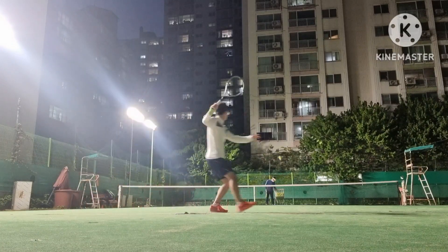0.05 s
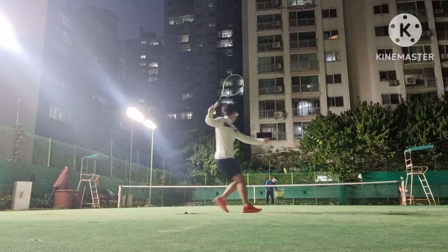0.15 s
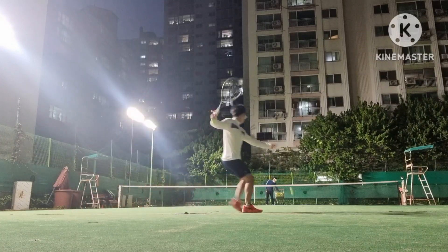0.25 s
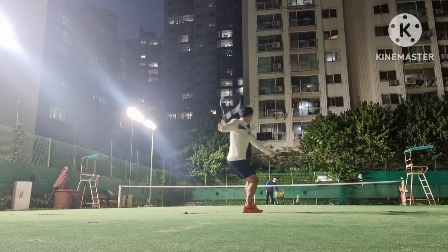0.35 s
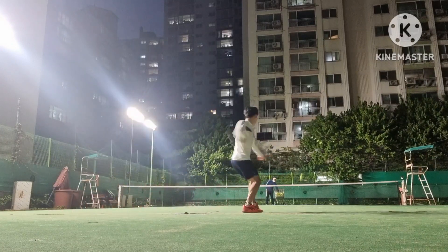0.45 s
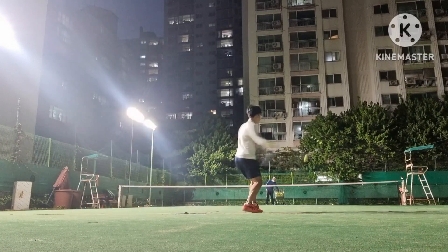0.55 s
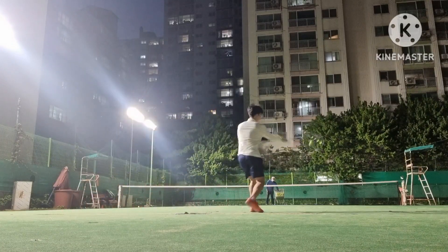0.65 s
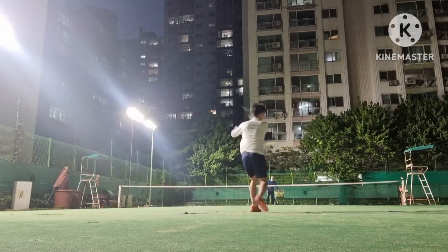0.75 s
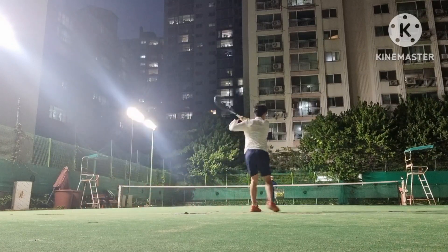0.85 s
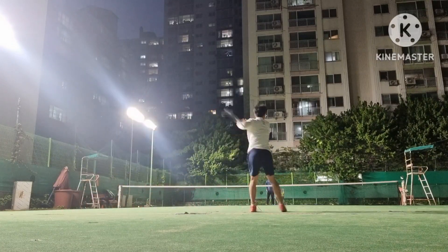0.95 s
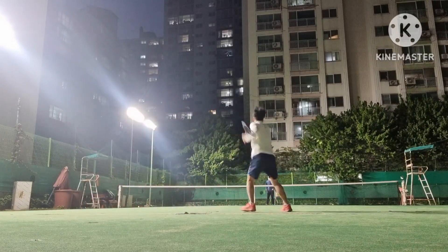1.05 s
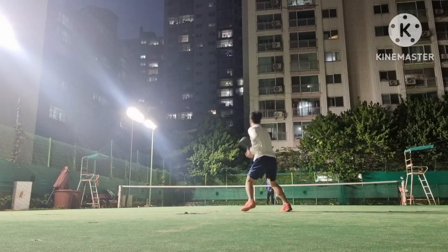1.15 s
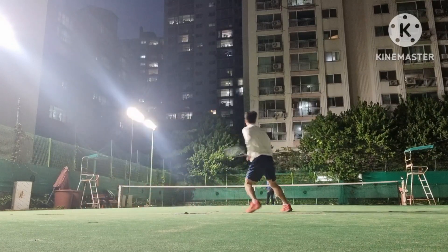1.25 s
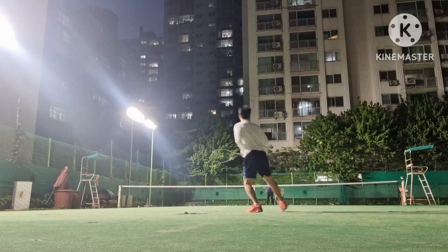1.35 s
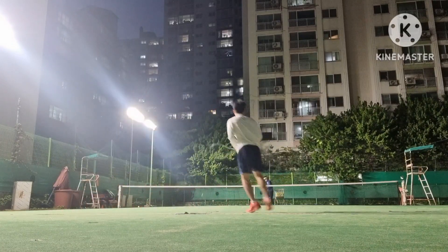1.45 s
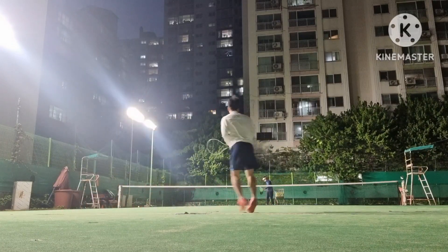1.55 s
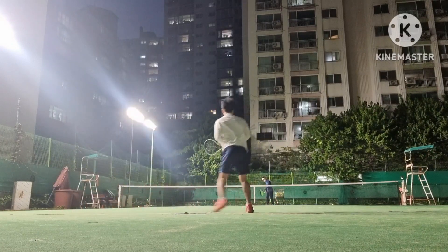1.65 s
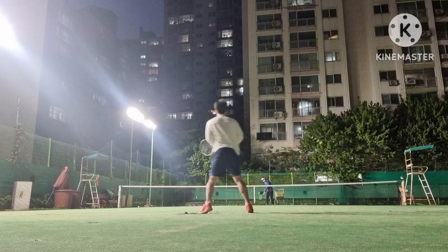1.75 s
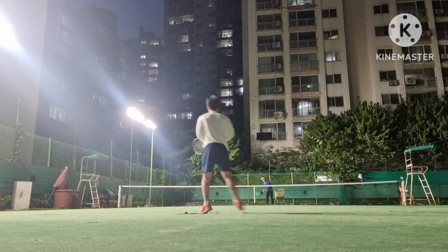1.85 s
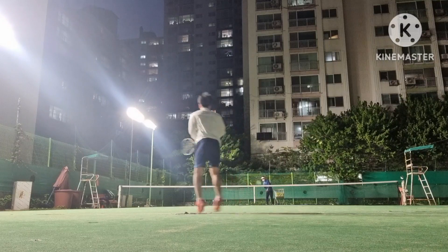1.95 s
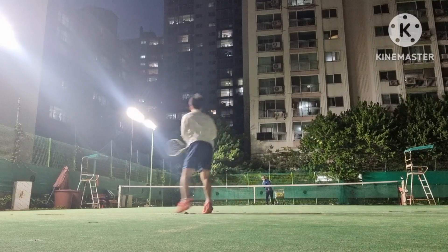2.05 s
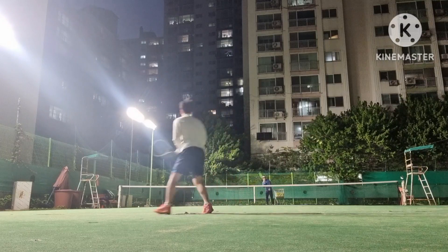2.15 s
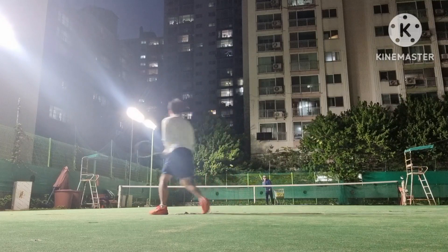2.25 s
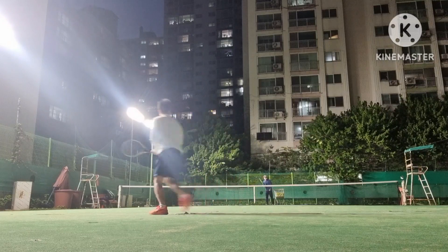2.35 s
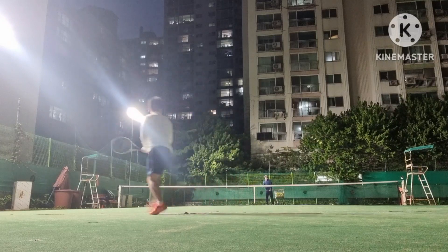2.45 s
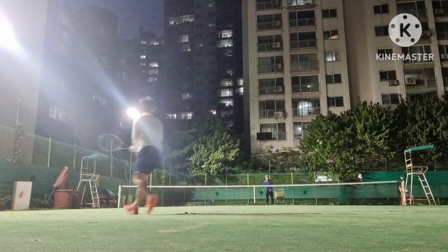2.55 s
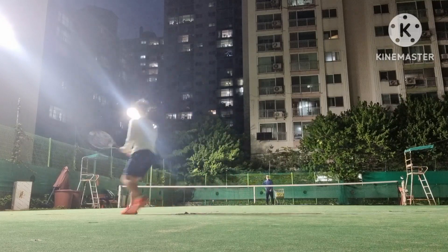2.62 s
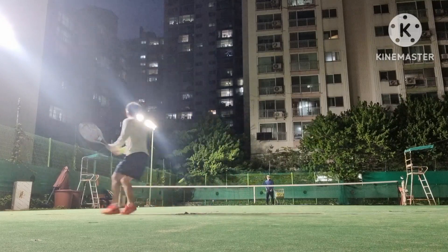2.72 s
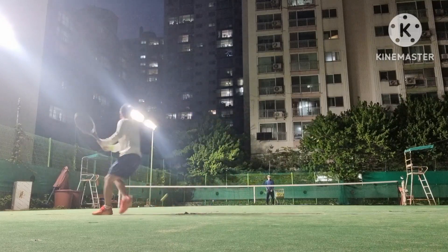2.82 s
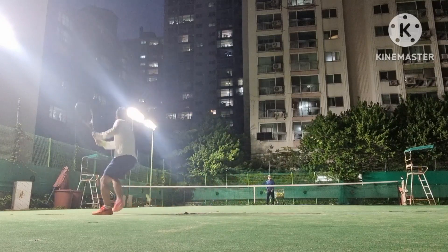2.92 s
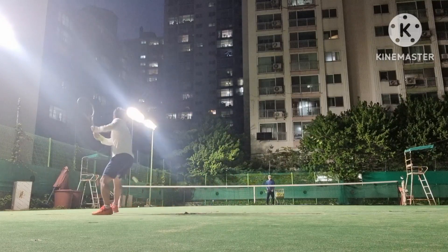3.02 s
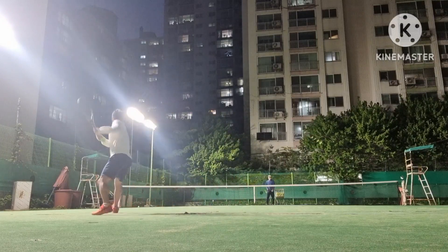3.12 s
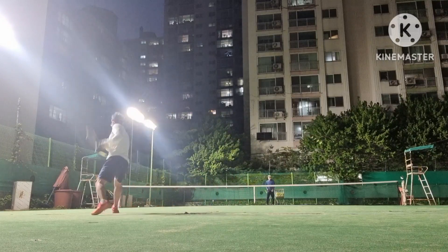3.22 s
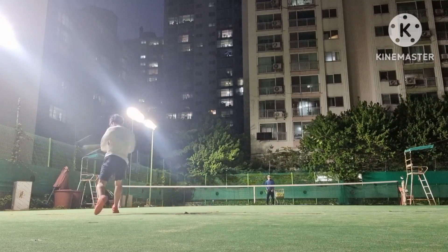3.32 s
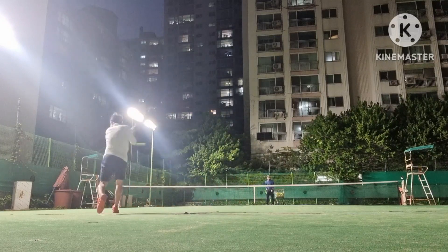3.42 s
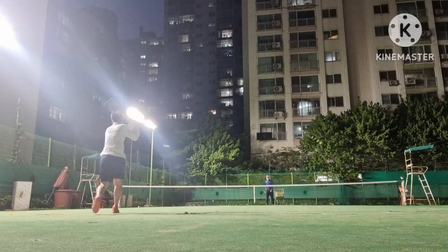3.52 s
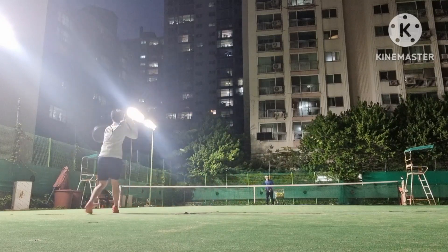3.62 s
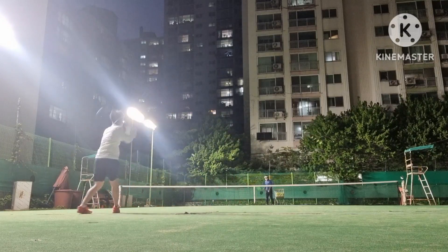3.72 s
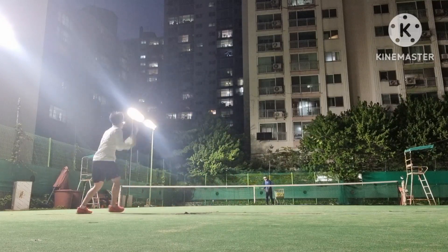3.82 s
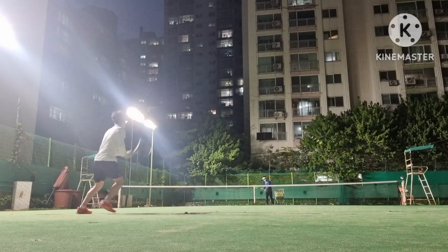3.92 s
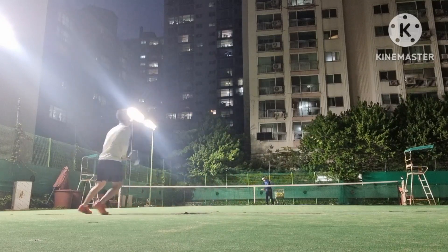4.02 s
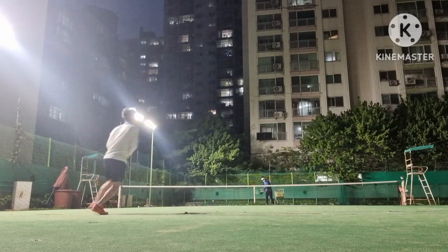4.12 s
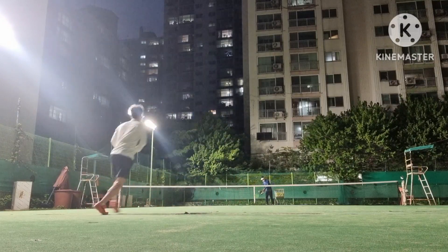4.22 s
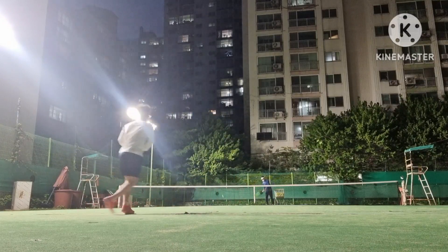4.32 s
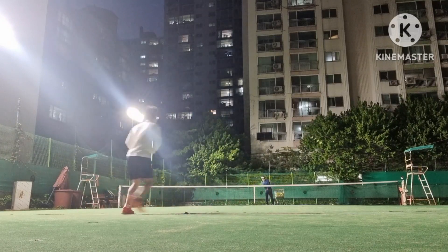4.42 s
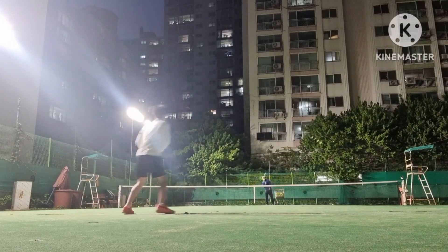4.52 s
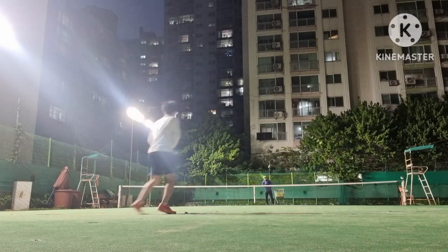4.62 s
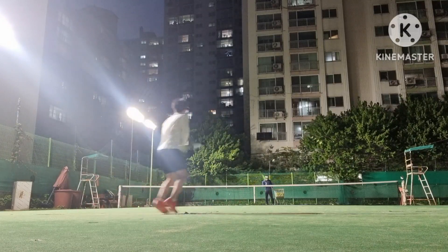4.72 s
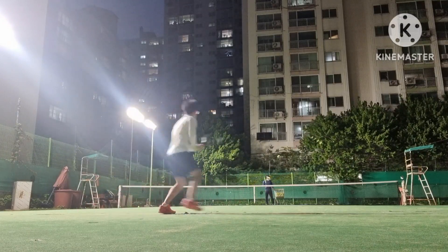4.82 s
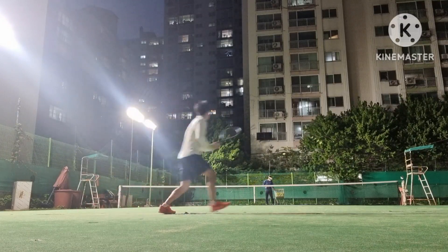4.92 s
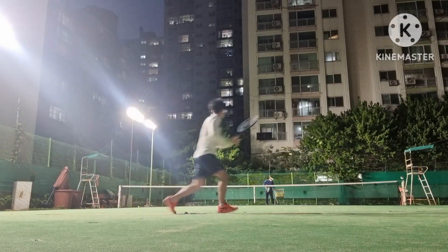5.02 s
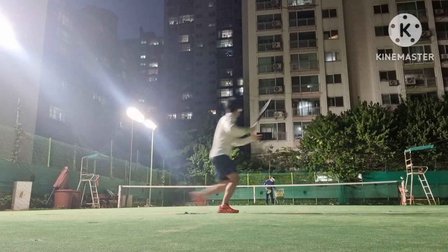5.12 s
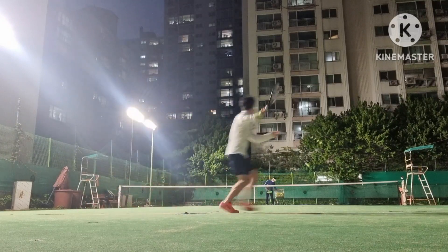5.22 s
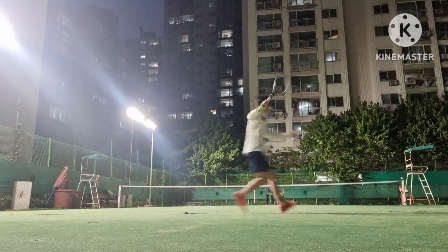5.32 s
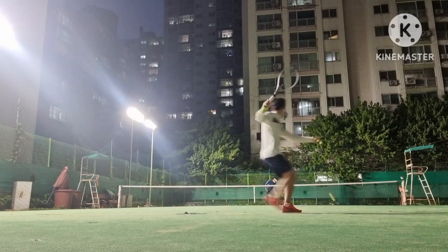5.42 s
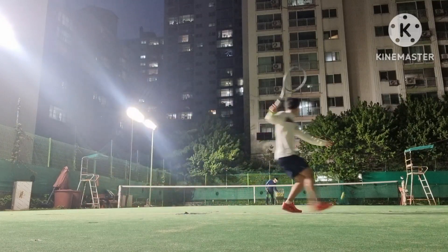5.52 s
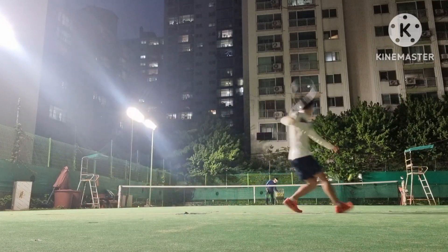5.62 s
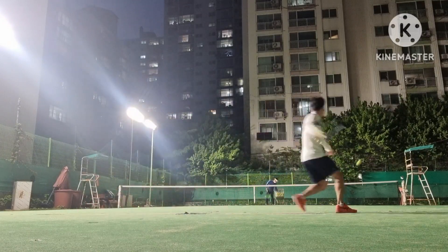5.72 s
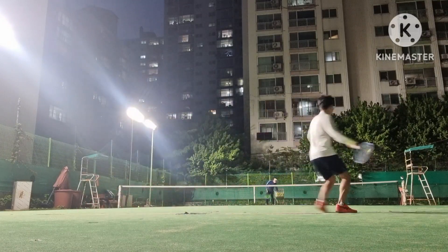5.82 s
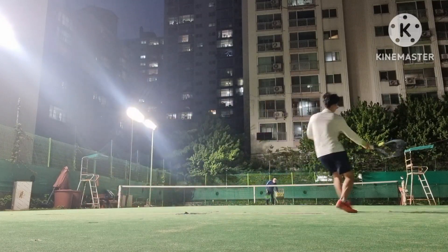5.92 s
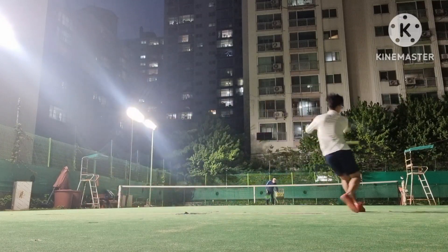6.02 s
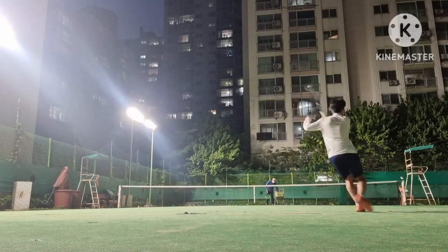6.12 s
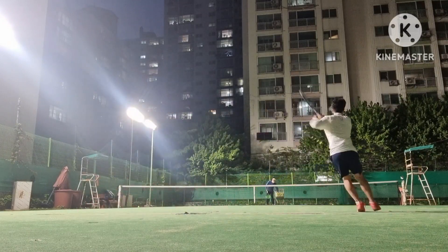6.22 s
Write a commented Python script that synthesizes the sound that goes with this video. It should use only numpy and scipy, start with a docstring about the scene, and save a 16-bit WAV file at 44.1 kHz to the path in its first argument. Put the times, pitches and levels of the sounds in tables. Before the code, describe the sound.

A faint distant knock opens, then shoes grind sand, a ball bounces and a racquet strikes with a thump, pop and short stringy ring. Quiet footsteps and far ball knocks follow before a weaker second hit and, after more scuffing, a strong third near the end. Open court with building echoes and steady city rumble, heard in stereo from behind the near player.

```python
"""A tennis rally on a sanded artificial-grass court between tower blocks, over a rumbling city.
A faint knock from the far end opens it; shoes scuff the sand, and each near stroke follows a light bounce and pops
loudly near 0.8, 3.4 and 6.1 s: brushed felt, a thump and a pop of the ball, then ringing racquet modes. Air swishes
around the first and last; a thin hiss leads into the second. Between strokes come faint knocks of ball and far player.
Walls return quick slaps, the towers a long dull echo; noises and damped vibrations make every source."""
import sys
import numpy as np
from scipy import signal
from scipy.fft import rfft, irfft
from scipy.io import wavfile

SR = 44100
rng = np.random.default_rng(int(sys.argv[2]) if len(sys.argv) > 2 else 0)


def pcm_store(signal):
    """Save signal as 16-bit PCM."""
    levels = np.round(np.clip(np.atleast_2d(signal), -1, 1) * 32767)
    wavfile.write(sys.argv[1], SR, levels.astype(np.int16).T)


N = 276066
TIME = np.arange(N) / SR
AGE = TIME[:SR // 2]    # s since the start of one event


def from_db(db):
    """Decibels to gain."""
    return 10 ** (np.asarray(db) / 20)


def at_hz(points, hz):
    """Read a table on a log-frequency axis."""
    f, value = np.transpose(points)
    return np.interp(np.log(hz + 1), np.log(f), value)


def level(rows):
    """Gain over time from rows of (s, dB)."""
    return from_db(np.interp(TIME, *np.transpose(rows)))


def fade(t, t60):
    """Exponential decay, 60 dB down after t60 seconds."""
    return np.exp(-np.log(1000) * t / t60)


def onset(rise_s):
    """Exponential approach to full strength."""
    return 1 - np.exp(-AGE / rise_s)


def noise(spectrum, size):
    """Diffuse stereo noise of a given colour, rms 1; the channels are alike in the bass, not in the treble."""
    # Likeness of the two microphones. Each row: frequency in Hz, left-right correlation.
    likeness = [(60, 0.99), (130, .93), (290, .8), (640, 0.92), (1400, 0.033), (3100, 0.089), (7000, 0.039),
                (15000, .05)]
    hz = np.arange(size // 2 + 1) * SR / size
    mid, side = rfft(rng.standard_normal((2, size)))
    alike = np.clip(at_hz(likeness, hz), -1, 1)
    both = np.sqrt(1 + alike) * mid + np.sqrt(1 - alike) * side * [[1], [-1]]
    x = irfft(both * from_db(at_hz(spectrum, hz)), size)
    return x / x.std()


def lowpass(x, hz):
    """Second-order low-pass."""
    return signal.sosfilt(signal.butter(2, min(hz, SR / 2 - 1), fs=SR, output="sos"), x)


def highpass(x, order, hz):
    """Butterworth high-pass."""
    return signal.sosfilt(signal.butter(order, hz, "high", fs=SR, output="sos"), x)


def later(x, s):
    """Delay a mono sound by s seconds."""
    t = TIME[:len(x)]
    return np.interp(t - s, t, x, left=0, right=0)


def add(out, s, sound, pan_db):
    """Mix one event in at its time; pan_db is left minus right."""
    i = max(round(s * SR), 0)
    panned = sound * from_db([[pan_db / 2], [-pan_db / 2]])
    out[:, i:i + len(AGE)] += panned[:, :N - i]


def scattered(x, db, spread_s=.003, count=5):
    """Ground and body throw a few close reflections that colour each event differently at each microphone."""
    out = x.copy()
    for channel in range(2):
        for delay_s in rng.uniform(.1, 1, count) * spread_s:
            reflection = later(x[channel], round(delay_s * SR) / SR)
            out[channel] += from_db(db) * rng.choice([-1, 1]) * reflection
    return out / np.sqrt(1 + count * from_db(db) ** 2)


def pulse(hz, swell_s, low_cut_hz=150):
    """A heavily damped vibration that swells and dies within a few cycles; so small a body radiates no bass."""
    u = AGE / swell_s
    envelope = (u * np.exp(1 - u)) ** 1.7
    x = -np.sin(2 * np.pi * hz * AGE) * envelope
    return highpass(highpass(x, 1, 60), 2, low_cut_hz)


def racquet(centre_hz, lag_ms, octaves=0.37, touch_s=0.0014, grip_t60_s=.065):
    """Modes of strings and frame; where the ball lands sets which speak, and hand and ball damp them all."""
    # String bed and frame modes. Each row: frequency in Hz, relative level in dB, t60 in s before grip damping.
    modes_table = [(392, 0.5, 0.11), (1052, -2.5, 0.16), (1113, 2, 0.057), (1385, -10.5, 0.044),
                   (1860, -3.5, 0.045), (2030, 2.5, 0.061), (2350, -7.5, 0.038), (2556, -8, 0.037),
                   (3230, -4.5, 0.068), (3330, -2.5, 0.032), (3630, -2, 0.036), (3947, 4.5, 0.04),
                   (4680, -5.5, 0.0083), (5070, -5.5, 0.047), (6008, -10, 0.066), (8455, -14.5, 0.062)]
    hz, db, t60 = np.transpose(modes_table)[:, :, None]
    favour = 0.43 + np.exp(-(np.log2(hz / centre_hz) / octaves * 2) ** 2)
    t = AGE + np.array([1, -1])[:, None, None] * lag_ms / 2000    # half the lag in s, either way
    # neighbouring modes tend to swing opposite ways
    phase = np.pi * np.arange(len(hz))[:, None] + rng.normal(0, 1.2, (2, *hz.shape))
    modes = from_db(db) * favour * fade(AGE, t60) * np.sin(2 * np.pi * hz * t + phase)
    return modes.sum(axis=1) * fade(AGE, grip_t60_s) * onset(touch_s) / 2


def skid(centre_hz, octaves=.3):
    """The ball skids across the strings: a narrow rasp around their favoured pitch."""
    shape = [(-4, -50), (-1, -16), (-.5, 0), (.5, 0), (1, -16), (4, -50)]    # (band widths off centre, dB)
    band = [(centre_hz * 2 ** (k * octaves), db) for k, db in shape]
    return noise(band, len(AGE)) * fade(AGE, t60=0.026) * onset(0.00059)


def strokes(strings_s=0.0013, fuzz_db=-24, brush_rise_s=0.00042, treble_pan=1.7, skid_db=-2, dip_hz=600, dip_q=8.7):
    """Felt brushes the strings, the squashed ball thumps, then pops back into shape as it leaves the racquet."""
    # Near strokes. Each row: start in seconds, thump level in dB, thump pitch in Hz, pop level in dB,
    # pop pitch in Hz, pop delay in s, strings level in dB, favoured string pitch in Hz, felt brush level in dB,
    # left-right difference of the ball in dB, right channel lag in ms.
    stroke_rows = [(0.8003, -7, 331.6, -10.5, 932, .0026, -18.5, 2848, -20.5, 1.5, 0.087),
                   (3.4478, -13.5, 315, -17, 885, 0.0041, -31, 4810, -34, 0, -0.17),
                   (6.1050, -7.5, 277, -8.5, 799, 0.00311, -18, 3400, -21.5, 0.5, 0.197)]
    # Felt dragged over the strings. Each row: frequency in Hz, relative level in dB per Hz.
    brush_colour = [(300, 2.5), (1200, 5), (1600, -1), (3300, -0.5), (4500, -12), (7000, -9), (10000, -12),
                    (14500, -16), (16000, -16.5)]
    out = np.zeros((2, N))
    for (s, thump_db, thump_hz, pop_db, pop_hz, pop_s, strings_db, centre_hz,
         brush_db, pan_db, lag_ms) in stroke_rows:
        thump = from_db(thump_db) * pulse(thump_hz, swell_s=0.0014, low_cut_hz=210)
        pop = from_db(pop_db) * later(pulse(pop_hz, swell_s=.0015), pop_s)
        # little rings between thump and pop
        hollow = signal.lfilter(*signal.iirnotch(dip_hz, dip_q, fs=SR), thump + pop)
        ball = np.array([later(hollow, side * lag_ms / 2000) for side in (-1, 1)])
        # the strings slide back after the blow
        rub = fade(AGE, t60=.03) + from_db(fuzz_db) * fade(AGE, t60=.11)
        brush = from_db(brush_db) * noise(brush_colour, len(AGE)) * rub * onset(brush_rise_s)
        rasp = from_db(strings_db + skid_db) * skid(centre_hz)
        ring = from_db(strings_db) * racquet(centre_hz, lag_ms)
        treble_pan_db = treble_pan * pan_db    # short waves are shadowed more
        add(out, s, ball, pan_db)
        add(out, s, scattered(brush + rasp, db=-12.0), treble_pan_db)
        add(out, s + strings_s, ring, treble_pan_db)
    return out


def swell(top_s, rise_s, fall_s):
    """An effort that grows by 20 dB in rise_s up to its top, then falls by 20 dB in fall_s."""
    away = np.maximum((top_s - TIME) / rise_s, (TIME - top_s) / fall_s)
    return from_db(-20 * np.minimum(away, 10))


def swings():
    """Air swishes through the strings, louder as the racquet gathers speed; a faster swing sounds higher."""
    # Each row: time of highest speed in s, rise by 20 dB in s, fall by 20 dB in s, level in dB, pitch factor.
    swing_rows = [(.672, .06, .12, -52, .95), (.803, .11, .05, -50, 1.05), (6.10, .045, .04, -53, 1.08)]
    # Swish at pitch factor 1. Each row: frequency in Hz, relative level in dB per Hz.
    swish_colour = [(1000, -30), (2200, -8), (3000, 3), (3900, 0), (5000, -22), (6500, -31), (7700, -20),
                    (11000, -31), (16000, -32)]
    out = np.zeros((2, N))
    for s, rise_s, fall_s, db, pitch in swing_rows:
        air = noise([(hz * pitch, colour_db) for hz, colour_db in swish_colour], N)
        out += from_db(db) * swell(s, rise_s, fall_s) * air
    return scattered(out, db=-10)


def knocks(thump_hz=265, soft_hz=3000):
    """Ball on the ground or at the far end: contact tick, ringing shell, hollow thump, softened by felt and turf."""
    # Each row: start in seconds, thump level in dB, shell level in dB, shell pitch in Hz, tick level in dB,
    # left-right difference in dB; levels before softening.
    knock_rows = [(0.041, -62, -51, 1200, -51, 1.5), (0.4582, -30.5, -37, 892, -43, 0.5),
                  (1.772, -47, -45.5, 860, -73.5, -5), (2.0010, -43, -47.5, 843, -51, 3),
                  (2.4470, -60, -54, 1072, -56, 3), (3.0126, -33.5, -32, 1144, -52.5, 0.5),
                  (3.6190, -55, -43, 733, -57, -4), (4.398, -47.5, -48.5, 1000, -51, -2),
                  (4.486, -49, -53, 950, -60.5, -1.5), (5.604, -32.5, -33, 1150, -44.5, 1.5)]
    # Felt on turf. Each row: frequency in Hz, relative level in dB per Hz.
    tick_colour = [(150, -4), (400, -5.5), (700, 1.5), (1300, -9), (2000, -9), (3200, -18), (4200, -25.5),
                   (8000, -43.5), (16000, -51.5)]
    out = np.zeros((2, N))
    for s, thump_db, shell_db, shell_hz, tick_db, pan_db in knock_rows:
        thump = from_db(thump_db) * np.sin(2 * np.pi * thump_hz * AGE) * fade(AGE, t60=.042)
        shell = from_db(shell_db) * np.sin(2 * np.pi * shell_hz * AGE) * fade(AGE, t60=.015)
        tick = from_db(tick_db) * noise(tick_colour, len(AGE)) * fade(AGE, t60=.036)
        knock = (tick - thump - shell) * onset(0.0007)
        add(out, s, lowpass(knock, soft_hz), pan_db)
    return out


def slips(hz):
    """Random unevenness up to a given rate, spread 1."""
    x = lowpass(rng.standard_normal(len(AGE)), hz)
    return x / x.std()


def sand(sole, grind, spray, stumble_db=1.6, grain_db=3.4):
    """Sole, grinding and flying grains, each at its own gain; the sand gives way in uneven slips."""
    # Hollow sole, sole grinding the turf, loose grains. Each row: frequency in Hz, relative level in dB per Hz.
    sole_colour = [(100, -7), (260, 2), (600, -11.5), (900, -1), (1100, 2), (1400, -16), (3000, -27.5),
                   (16000, -63)]
    grind_colour = [(150, -3.5), (900, -0.5), (1400, -1.5), (1750, 2), (2100, 1), (2700, 5), (3200, 5),
                    (4200, -12), (5400, -13.5), (7000, -41), (16000, -50)]
    spray_colour = [(1500, -22.5), (3500, -2.5), (5500, 4), (6900, -8), (8000, -7), (10000, -12.5),
                    (14500, -14.5), (16000, -19)]
    size = len(AGE)
    rub = sole * noise(sole_colour, size) + grind * noise(grind_colour, size)
    rub = rub * from_db(grain_db * slips(500))
    grains = spray * noise(spray_colour, size) * from_db(grain_db * slips(1500))
    stumble = from_db(stumble_db * slips(48) - 1)
    return scattered((rub + grains) * stumble, db=-7, spread_s=0.0022)


def footsteps(pan_db=0.3, land_s=0.0085, stop_s=.05, sole_stop_s=.049):
    """A shoe takes the weight over land_s, skids briefly, then falls by 20 dB per stop time."""
    # Each row: start in seconds, skid duration in s, sole level in dB, grinding level in dB, grain spray level in dB.
    step_rows = [(.211, 0.0075, -67, -66.5, -72.5), (1.675, .007, -51, -63, -70),
                 (1.827, .014, -60.5, -50, -56), (2.126, 0.0078, -55, -65, -66),
                 (2.284, 0.019, -60.5, -68, -80), (2.667, 0.017, -61, -64, -70.5),
                 (2.875, 0.033, -57, -69, -71.5), (4.112, .015, -65, -66, -66),
                 (4.393, 0.022, -53, -71, -73.5), (4.623, 0.024, -48.5, -49.5, -56.5),
                 (4.747, .012, -63.5, -62, -68.5), (4.858, 0.024, -55, -53, -64),
                 (5.915, .03, -67.5, -61, -67)]
    out = np.zeros((2, N))
    for s, skid_s, sole_db, grind_db, spray_db in step_rows:
        weight = np.minimum(AGE / land_s, 1)
        stopped_s = np.maximum(AGE - skid_s, 0)
        sole = weight * from_db(sole_db - 20 * stopped_s / sole_stop_s)
        slide = weight * from_db(-20 * stopped_s / stop_s)
        add(out, s, sand(sole, slide * from_db(grind_db), slide * from_db(spray_db)), pan_db)
    return out


def drags(stop_s=.055, sole_db=-6, pan_db=2.2):
    """A dragged or turned shoe presses harder and harder into the sand, then falls by 20 dB per stop_s."""
    # Each row: time of hardest push in s, build-up in s, grinding level in dB, grain spray level in dB.
    drag_rows = [(.411, 0.0082, -50.5, -87), (.455, .025, -46.5, -83), (1.065, 0.046, -53.5, -85),
                 (1.13, 0.036, -50, -74), (1.338, .02, -55.5, -84), (1.372, .025, -53.5, -82),
                 (1.59, .03, -71, -95), (1.72, .012, -63, -84.5), (2.173, .008, -60.5, -82),
                 (2.348, .014, -66.5, -83), (3.797, 0.041, -51.5, -63), (5.44, .014, -59.5, -84),
                 (5.745, 0.052, -63.5, -85)]
    out = np.zeros((2, N))
    for s, rise_s, grind_db, spray_db in drag_rows:
        push = np.minimum(AGE / rise_s, 1) * from_db(-20 * np.maximum(AGE - rise_s, 0) / stop_s)
        grind = push * from_db(grind_db)
        sole = grind * from_db(sole_db)
        add(out, s - rise_s, sand(sole, grind, push * from_db(spray_db)), pan_db)
    return out


def clicks(rise_s=0.0018, t60=0.027, sole_db=-5, grind_db=2.5, pan_db=.6):
    """Single bright clicks: the first tops the knock from the far end, the others are grit snapping under a shoe."""
    # Each row: start in seconds, level of the grain noise in dB.
    click_rows = [(.040, -64), (1.802, -54), (3.735, -66), (5.056, -73)]
    out = np.zeros((2, N))
    for s, db in click_rows:
        click = from_db(db) * np.minimum(AGE / rise_s, 1) * fade(np.maximum(AGE - rise_s, 0), t60)
        add(out, s, sand(click * from_db(sole_db), click * from_db(grind_db), click), pan_db)
    return out


def hiss():
    """A thin high hiss swells ahead of the second stroke and fades."""
    # Each row: time in s, level in dB.
    hiss_level = [(2.88, -92), (3.04, -71), (3.17, -70), (3.30, -79), (3.44, -79), (3.5, -110)]
    # Each row: frequency in Hz, relative level in dB per Hz.
    hiss_colour = [(2000, -22), (3800, -8), (5000, 2.5), (7000, -9), (10000, -9.5), (14500, -8),
                   (16000, -20)]
    started = TIME > hiss_level[0][0]
    return level(hiss_level) * started * noise(hiss_colour, N)


def tail(spectrum, db, start_s, swell_s, t60):
    """Dense reflections that build up and die away, with a mean energy per channel of db."""
    t = np.maximum(TIME[:2 * SR] - start_s, 0)
    x = noise(spectrum, len(t)) * (1 - np.exp(-t / swell_s)) * fade(t, t60)
    return from_db(db) * x / np.sqrt(np.sum(x ** 2) / 2)


def court(x):
    """Scatter from the ground and wire fence, a few slaps, and the late wash from the towers."""
    # Fence, walls and nearest tower faces. Each row: delay in s, level in dB, low-pass cutoff in Hz.
    echo_rows = [(.0085, -28, 3062), (0.0209, -27, 1800), (0.0458, -22, 1600), (0.066, -34, 9000),
                 (.117, -35, 1300), (.167, -38, 2522), (.191, -31, 1700), (.24, -34, 1200)]
    # Court tail, tower echo, bright fence scatter. Each row: frequency in Hz, relative level in dB per Hz.
    court_colour = [(100, -15), (300, -0.5), (500, -2), (850, -3.5), (1250, 8.5), (2000, 2.5), (3600, -7.5),
                    (5500, -3), (9000, -6.5), (16000, -11.5)]
    tower_colour = [(100, -13), (300, -3.5), (500, -0.5), (820, -9), (1150, 5), (1500, 5.5), (2100, -0.5),
                    (2800, -14), (4000, -21), (8000, -37.5), (16000, -55)]
    fence_colour = [(500, -15), (2000, -4), (5000, 2), (9000, 0), (16000, -3)]
    response = tail(court_colour, db=-18, start_s=0.0056, swell_s=0.0014, t60=.12)
    response += tail(court_colour, db=-30.5, start_s=0.028, swell_s=0.022, t60=0.4)
    response += tail(tower_colour, db=-27.5, start_s=.165, swell_s=0.029, t60=2.0)
    response += tail(fence_colour, db=-25, start_s=.036, swell_s=.008, t60=.11)
    for delay_s, db, top_hz in echo_rows:
        impulse = 1.0 * (np.arange(2 * SR) == round(delay_s * SR))
        response += from_db(db) * lowpass(impulse, top_hz)
    return x + signal.fftconvolve(x, response, axes=1)[:, :N]


def city():
    """Distant traffic: a steady low rumble of slowly varying level, slightly to the left."""
    # Each row: frequency in Hz, relative level in dB per Hz.
    city_colour = [(22, -17.5), (36, -8.5), (48, -3.5), (65, 1), (100, -5), (140, -8.5), (270, -8),
                   (500, -16.5), (800, -22), (1150, -29.5), (1700, -34), (3200, -37.5), (4100, -47.5),
                   (5400, -49), (7000, -56), (10000, -59), (14700, -55.5), (16000, -72.5)]
    # Each row: time in s, level in dB.
    city_level = [(0, -56), (1.2, -55), (2.2, -57), (3.3, -54), (4.3, -57), (5.2, -58.5), (6.26, -54.5)]
    return level(city_level) * noise(city_colour, N) * from_db([[.4], [-.4]])


def scene():
    """The rally echoes in the court; the city lies under it."""
    ball_and_racquet = strokes() + knocks() + swings()
    shoes_and_clicks = footsteps() + drags() + clicks()
    return court(ball_and_racquet + shoes_and_clicks + hiss()) + city()


def record(dry, cutoff_hz=15800):
    """The top is cut steeply."""
    return signal.sosfilt(signal.ellip(10, .1, 70, cutoff_hz, fs=SR, output="sos"), dry)


dry = scene()
out = record(dry)
pcm_store(out)
```